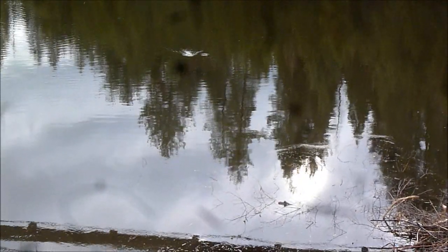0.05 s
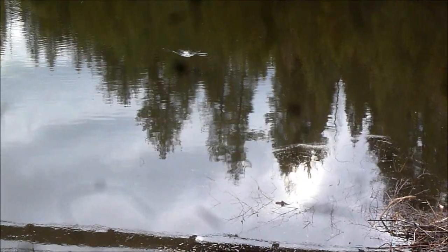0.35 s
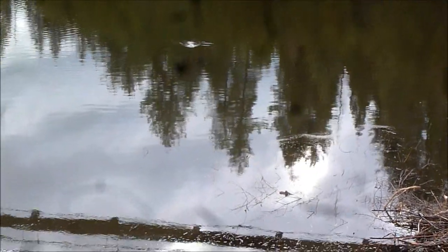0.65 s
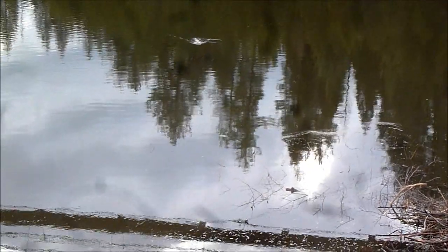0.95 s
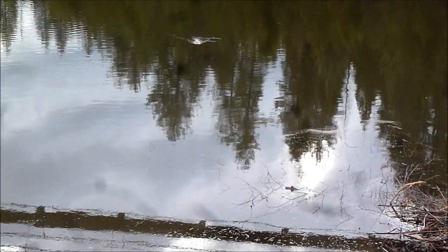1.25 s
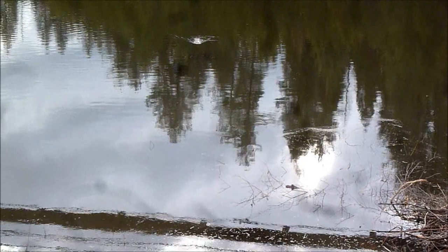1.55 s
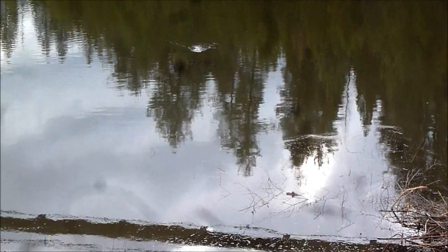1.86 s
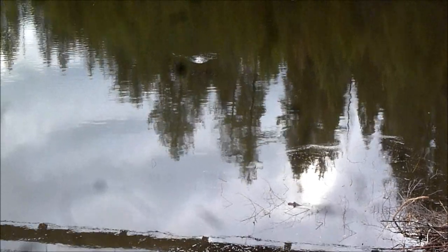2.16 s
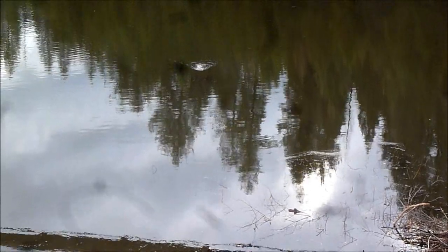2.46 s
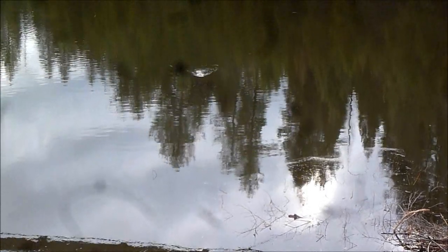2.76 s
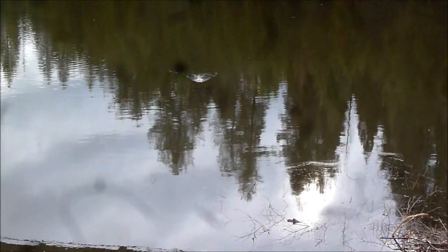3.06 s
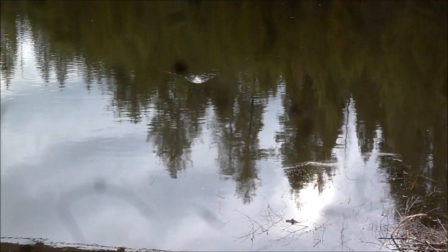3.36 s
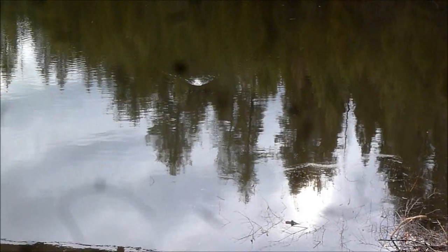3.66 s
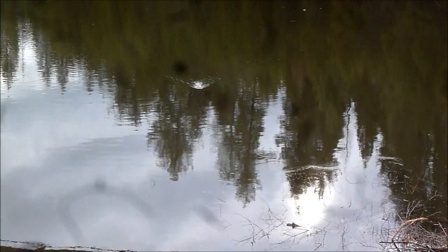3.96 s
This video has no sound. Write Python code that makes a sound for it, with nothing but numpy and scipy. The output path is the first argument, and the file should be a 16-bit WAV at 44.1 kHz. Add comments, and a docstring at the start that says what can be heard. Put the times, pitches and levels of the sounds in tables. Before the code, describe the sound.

Wind buffets the microphone beside a calm pond, with a gusty low rumble and small thumps.

```python
"""Uneven wind gusts buffet the two ports of a small stereo microphone beside a calm pond.
Each port has its own rumble, louder and brighter as the air speeds up; the hardest eddies land as
small bumps. Faint outdoor air and hiss lie below. The recorder limits each port's peaks and widens
the wind by feeding each side, inverted, into the other."""
import sys
import numpy as np
from scipy import signal
from scipy.io import wavfile
from scipy.ndimage import uniform_filter1d, minimum_filter1d

SR = 44100
rng = np.random.default_rng(int(sys.argv[2]) if len(sys.argv) > 2 else 0)


def wav_out(sig):
    """Save sig, one row per channel (or a flat mono array), as 16-bit PCM at SR to the path in sys.argv[1]."""
    wavfile.write(sys.argv[1], SR, np.round(np.clip(np.atleast_2d(sig).T, -1, 1) * 32767).astype(np.int16))


N = 176400


def wind_rumble(force_db):
    """Turbulence at one port. Stronger wind sheds smaller eddies: level and brightness rise together."""
    # Each row: time in seconds, spectrum shift in octaves.
    colour = [(0, -0.12), (.06, 0.37), (.1, 0.24), (.15, 0.43), (.18, 0.044), (.3, -0.3), (.45, -0.17),
              (.8, -0.49), (1.12, -0.45), (1.175, 0.23), (1.25, -0.48), (1.4, -0.45), (1.62, -0.23),
              (1.82, 0.016), (2.02, -0.62), (2.27, -0.06), (2.36, 0.14), (2.55, -0.43), (2.7, -0.3),
              (2.8, 0.32), (2.98, -0.0087), (3.2, 0.1), (3.5, 0.057), (3.58, 0.28), (3.66, 0.49),
              (3.75, 0.21), (4, 0.056)]
    # Each row: frequency in Hz, relative density in dB.
    spectrum = [(20, -3), (45, -3.5), (85, 0), (150, 3.5), (280, 6), (420, -5), (650, -12.5), (1000, -19),
                (1500, -39), (2300, -57.5), (4000, -73), (8000, -91)]
    reference_db, rumble_db = -17, -17  # reference force; rumble level there, ahead of the limiter
    octaves_per_db, eddy_octaves, eddy_db = 0.0647, 0.24, 0.67
    colour_octaves, = curves(colour)
    over_db = force_db - reference_db
    eddies = drift(rate_hz=90)
    shift_octaves = colour_octaves + octaves_per_db * over_db + eddy_octaves * eddies
    churn = from_db(eddy_db * eddies) * band_noise(spectrum, shift_octaves)
    window = int(0.043 * SR)  # over this span the level follows the force alone
    power = uniform_filter1d(uniform_filter1d(churn ** 2, window), window)
    return from_db(rumble_db + over_db) * churn / np.sqrt(power)


def eddy_bumps():
    """A hard eddy kicks the ports into a heavily damped swing; many start with a short, dry crack."""
    # Each row: start in seconds, signed left gain, signed right gain, frequency in Hz, crack share.
    bumps = [(.049, 0.014, 0.62, 447, 0.023), (0.1215, 0.39, 0.53, 450, 0.15),
             (0.146, 0.093, 0.46, 1500, 0.12), (.156, 0.28, -0.6, 810, 0.01), (.194, -0.14, 0.12, 600, 0),
             (0.215, 0.021, -0.44, 1010, .02), (.412, 0.27, -0.049, 806, .03),
             (0.472, -0.097, 0.24, 500, 0), (0.495, 0.25, 0.34, 220, 0), (.8153, -0.13, -0.2, 180, 0),
             (0.9323, -0.36, -0.58, 213, 0), (1.13, 0.35, 0.43, 550, .06), (1.171, 0, 0.39, 915, .04),
             (1.2843, 0.053, 0.3, 587, 0.021), (1.3155, -0.4, -0.27, 350, 0.051),
             (1.3394, 0.12, .7, 330, 0.069), (1.366, 0.34, 0.97, 127, 0), (1.437, -0.083, -0.29, 415, 0.06),
             (1.4985, -0.12, -0.33, 500, 0), (1.724, 0.5, 0.88, 150, 0), (2.011, .1, 0.72, 90.5, 0.01),
             (2.15, 0.46, 0.84, 270, 0.045), (2.189, 0, 0.78, 500, 0.013), (2.264, 0.86, 0.51, 150, 0.011),
             (2.276, 0.81, 0.56, 200, 0.023), (2.5706, -0.12, 1, 167, 0.16), (2.605, 0.084, .16, 605, 0),
             (2.638, 0, -0.51, 850, 0.016), (2.732, 0.088, 0.48, 500, 0.079),
             (2.7793, -.7, -0.41, 690, .17), (2.8251, -0.85, -0.33, 450, .14), (2.933, 1, 0.51, 252, 0.068),
             (3.0746, -1.02, -0.74, 410, .13), (3.184, -0.99, -0.23, 300, 0),
             (3.327, -0.079, -0.25, 1100, 0.1), (3.495, -0.39, -0.24, 330, .02),
             (3.5694, -0.87, -0.12, 450, .17), (3.622, 0.79, 0.059, 400, 0), (3.735, -0.2, -0.49, 950, 0.1),
             (3.89, -1.04, -0.72, 610, 0.085), (3.895, 0.19, 0.67, 900, 0)]
    t60_cycles, swing_top_hz = 2, 1710
    crack_t60_s, crack_top_hz = 0.011, 2480
    out = np.zeros((2, N + SR))
    t = np.arange(SR // 20) / SR
    for start_s, left, right, hz, crack_share in bumps:
        swing = np.sin(2 * np.pi * hz * t) * from_db(-60 * hz * t / t60_cycles)
        swing = signal.sosfilt(signal.butter(2, swing_top_hz, fs=SR, output="sos"), swing)
        crack = rng.standard_normal(len(t)) * from_db(-60 * t / crack_t60_s)
        crack = signal.lfilter(*signal.butter(2, crack_top_hz, fs=SR), crack)
        start = int(start_s * SR)
        out[:, start:start + len(t)] += np.outer([left, right], swing + crack_share * crack)
    return out[:, :N]


def limit(port, threshold_db=-1.5, attack_s=0.00067, release_db_per_s=158):
    """A fast limiter holds down the peaks of one port."""
    over_db = np.maximum(20 * np.log10(np.abs(port) + 1e-9) - threshold_db, 0)
    release_db = release_db_per_s * np.arange(N) / SR
    gain_db = release_db - np.maximum.accumulate(over_db + release_db)
    window = int(attack_s * SR)
    return port * from_db(uniform_filter1d(minimum_filter1d(gain_db, window), window))


def widen(ports, share=0.62, low_hz=464):
    """Each side receives the other, inverted and without its bass."""
    cross_feed = signal.lfilter(*signal.butter(1, low_hz, "high", fs=SR), ports[::-1])
    return ports - share * cross_feed


def background():
    """Distant open air, alike in both ports, and a thin hiss that reaches the right port first."""
    # Each row of both spectra: frequency in Hz, density in dB.
    air = [(20, -80.5), (80, -77), (250, -68), (500, -91), (880, -76.5), (1200, -95), (2000, -96),
           (4000, -100), (7000, -108)]
    hiss = [(500, -100), (1300, -87), (2200, -88), (3400, -89), (5000, -92.5), (6800, -96.5), (8000, -109)]
    # Each row: time in seconds, gain on air and hiss in dB.
    gains = [(0, -2), (.25, -1.5), (.6, 1), (.87, 3), (1.1, 4), (1.2, 1), (1.32, 3), (1.39, -0.6),
             (1.75, 0.5), (2.15, 3), (2.3, 0.5), (2.52, 2.5), (2.7, -2), (3.1, -1.5), (3.4, 0), (3.7, -1.5),
             (4, 0.5)]
    left_own_db, leak_db, lag_s = -21, -14.5, 0.00007
    gain_db, = curves(gains)
    t = np.arange(N) / SR
    right = band_noise(hiss)
    leak = from_db(leak_db) * np.interp(t - lag_s, t, right)
    left = from_db(left_own_db) * band_noise(hiss) + leak
    return from_db(gain_db) * (band_noise(air) + np.array([left, right]))


def band_noise(spectrum, shift_octaves=0):
    """Half-octave noise bands following a density spectrum that slides in frequency."""
    hz, density_db = np.transpose(spectrum)
    edges_hz = 20 * 2 ** np.arange(0, 9.1, 0.5)
    white = rng.standard_normal((2, N + SR // 2)) * np.sqrt(SR / 2)
    out = 0
    for k, band_hz in enumerate(zip(edges_hz, edges_hz[1:])):
        band = signal.sosfilt(signal.butter(2, band_hz, "band", fs=SR, output="sos"), white[k % 2])
        band = signal.sosfilt(signal.butter(2, 2 * band_hz[1], fs=SR, output="sos"), band)[-N:]
        octave = np.mean(np.log2(band_hz)) - shift_octaves
        out = out + band * from_db(np.interp(octave, np.log2(hz), density_db))
    return out


def drift(rate_hz):
    """Smooth random motion with unit standard deviation."""
    pole = np.exp(-2 * np.pi * rate_hz / SR)
    slow = signal.lfilter([1], [1, -2 * pole, pole * pole], rng.standard_normal(N + SR))[SR:]
    return slow / slow.std()


def curves(rows):
    """Each value column of a timed table, interpolated to every sample."""
    times_s, *columns = np.transpose(rows)
    return [np.interp(np.arange(N) / SR, times_s, column) for column in columns]


def from_db(db):
    """Decibels to gain."""
    return 10 ** (np.asarray(db) / 20)


def scene():
    """Rumble and bumps on both ports, limited, low-cut and widened, over the background."""
    # Each row: time in seconds, wind force on that port in dB.
    gusts_left = [(0.0, -14.5), (0.11, -25.5), (0.14, -20.5), (0.17, -27.5), (0.23, -28.0), (0.37, -33),
                  (0.41, -31.5), (0.54, -39), (0.57, -43), (0.9, -50), (0.93, -38), (1.01, -38),
                  (1.15, -24), (1.24, -42.0), (1.31, -27), (1.47, -33), (1.5, -17.5), (1.57, -20),
                  (1.61, -18.5), (1.71, -18.5), (1.78, -21.5), (1.86, -25), (1.89, -24.5), (1.97, -39.5),
                  (2.07, -30.5), (2.12, -53), (2.17, -25), (2.27, -17.5), (2.37, -25.5), (2.49, -51),
                  (2.57, -21), (2.59, -31), (2.66, -13), (2.69, -17), (2.88, -17.5), (2.99, -18.5),
                  (3.06, -17.5), (3.1, -17.5), (3.19, -15), (3.23, -17), (3.32, -16.5), (3.54, -17),
                  (3.57, -13.5), (3.69, -20.5), (3.77, -17), (3.83, -19.5), (3.87, -15), (3.97, -19.5),
                  (3.997, -20.5)]
    gusts_right = [(0.0, -24), (0.05, -18), (0.08, -17.5), (0.11, -16.5), (0.18, -22.5), (0.22, -16.5),
                   (0.25, -29.5), (0.28, -17.5), (0.37, -24.5), (0.42, -16), (0.45, -22), (0.5, -18),
                   (0.6, -35.5), (0.69, -27.5), (0.77, -39.5), (0.81, -27), (0.87, -33), (0.93, -20),
                   (0.98, -29), (1.04, -22.5), (1.07, -25.5), (1.115, -14), (1.145, -21.5), (1.175, -18.5),
                   (1.24, -27.5), (1.3, -18), (1.47, -19.5), (1.59, -17), (1.73, -16.5), (1.75, -19.5),
                   (1.8, -16), (1.88, -23.5), (1.91, -18.0), (1.94, -31.5), (1.99, -22.5), (2.03, -24),
                   (2.07, -22), (2.11, -29), (2.15, -17.5), (2.32, -17.5), (2.37, -16.5), (2.41, -24.5),
                   (2.43, -16), (2.46, -30.5), (2.55, -23), (2.57, -23.5), (2.6, -30), (2.62, -15.5),
                   (2.67, -20.5), (2.74, -18.0), (2.84, -17), (2.86, -18.0), (3.0, -19), (3.06, -17),
                   (3.11, -24.5), (3.14, -17.5), (3.42, -20), (3.5, -15.5), (3.52, -15), (3.63, -18.5),
                   (3.69, -21.5), (3.74, -21.5), (3.83, -19), (3.97, -17.5), (3.997, -17.5)]
    port_low_hz = 78.6  # the ports lose the deepest rumble
    forces_db = curves(gusts_left) + curves(gusts_right)
    ports = [limit(wind_rumble(force_db) + bumps) for force_db, bumps in zip(forces_db, eddy_bumps())]
    ports = signal.sosfilt(signal.butter(2, port_low_hz, "high", fs=SR, output="sos"), np.array(ports))
    return widen(ports) + background()


def record(dry):
    """Short fade-out, then a steep treble cut."""
    fade_s, cutoff_hz = 0.005, 7400
    fade = np.minimum(np.arange(N)[::-1] / (fade_s * SR), 1)
    return signal.sosfilt(signal.ellip(10, 0.2, 70, cutoff_hz, fs=SR, output="sos"), dry * fade)


dry = scene()
out = record(dry)
wav_out(out)
```